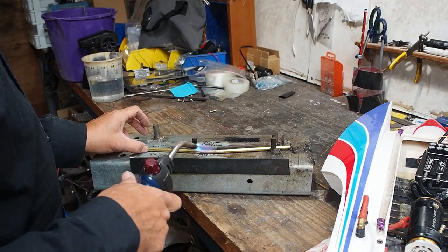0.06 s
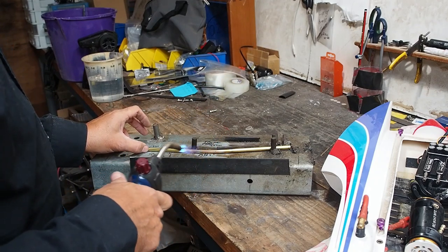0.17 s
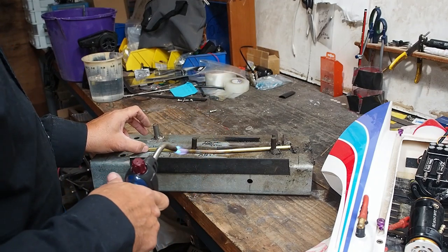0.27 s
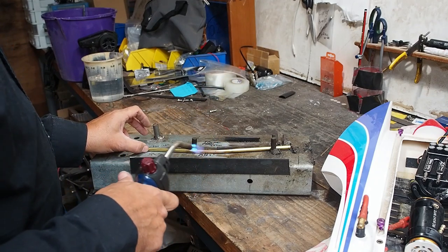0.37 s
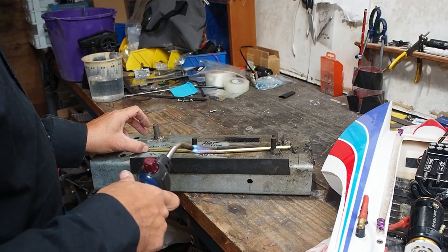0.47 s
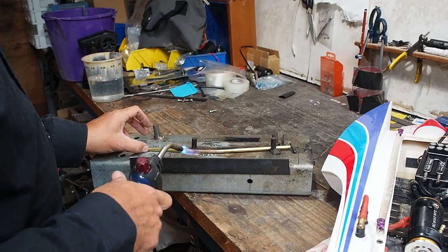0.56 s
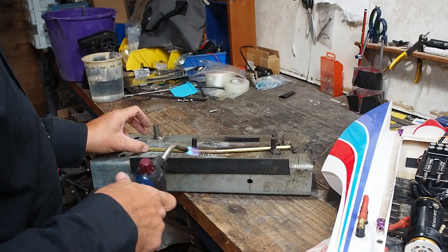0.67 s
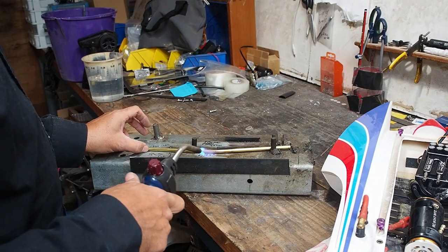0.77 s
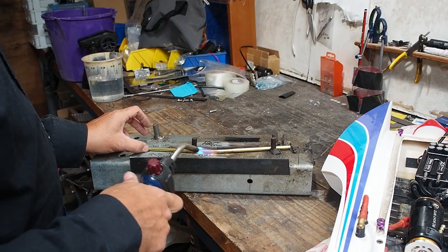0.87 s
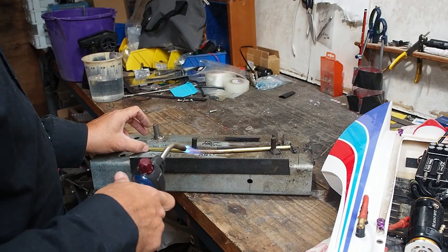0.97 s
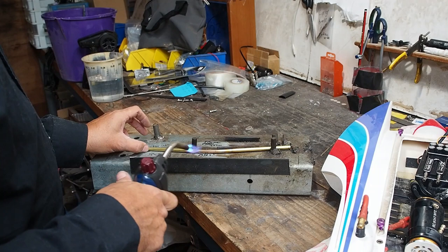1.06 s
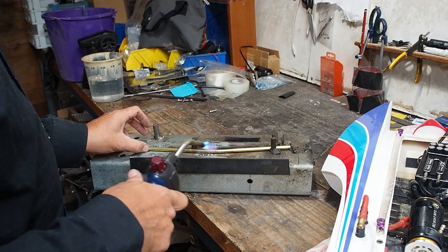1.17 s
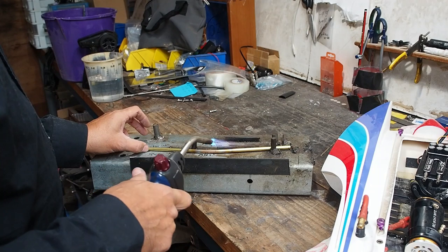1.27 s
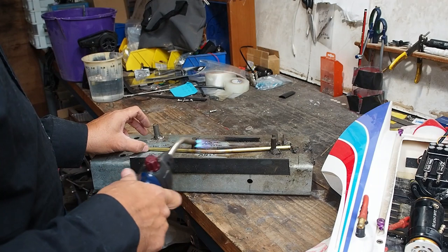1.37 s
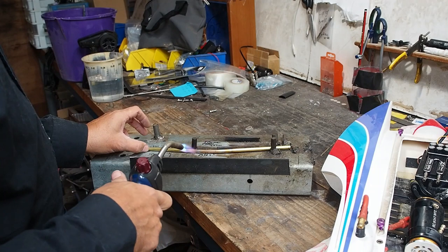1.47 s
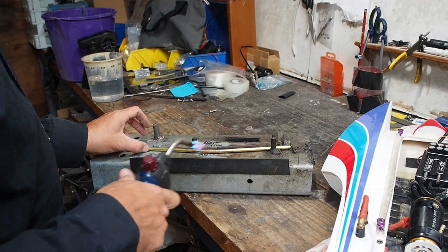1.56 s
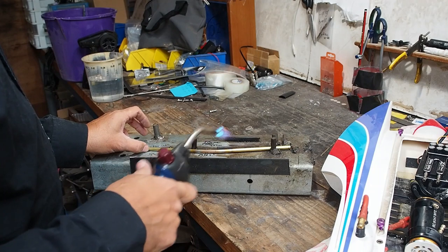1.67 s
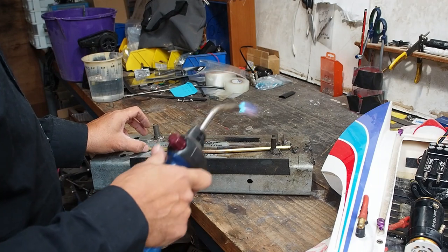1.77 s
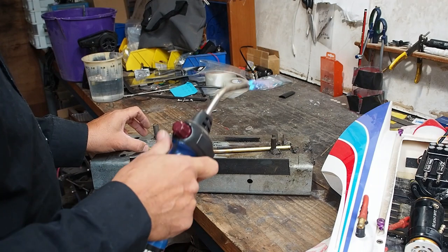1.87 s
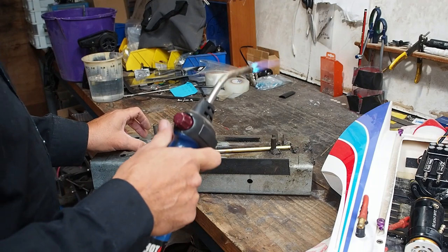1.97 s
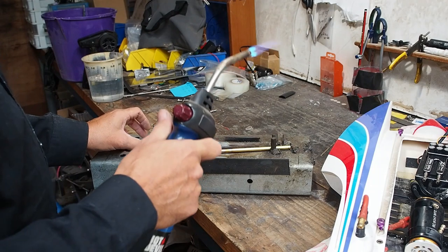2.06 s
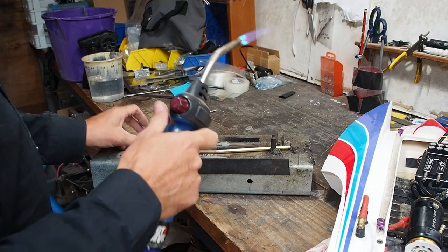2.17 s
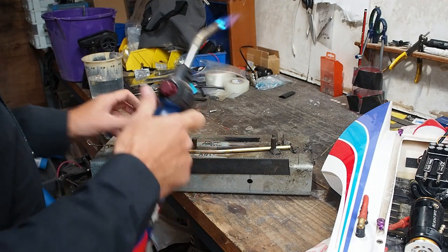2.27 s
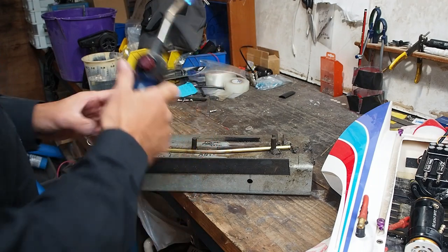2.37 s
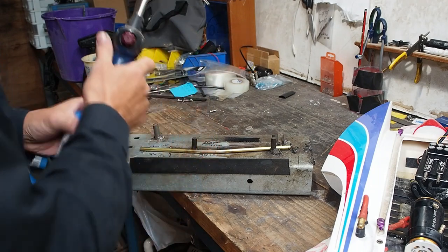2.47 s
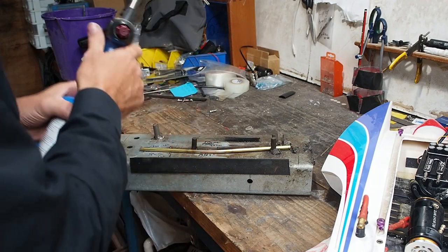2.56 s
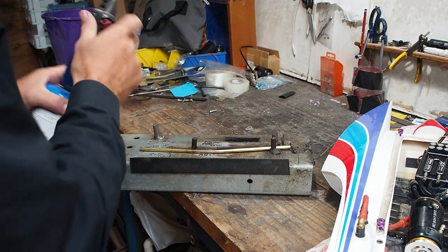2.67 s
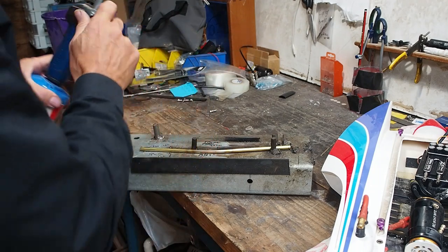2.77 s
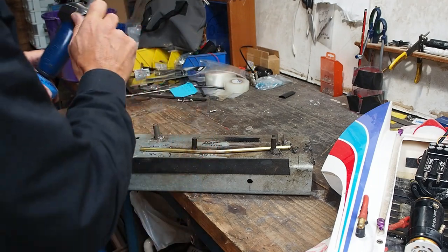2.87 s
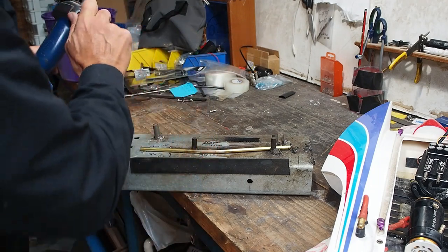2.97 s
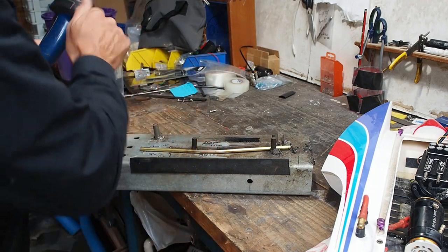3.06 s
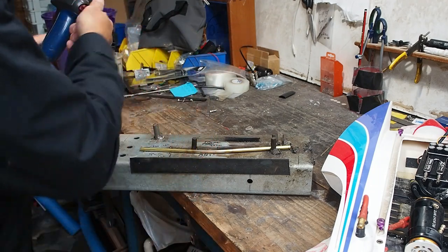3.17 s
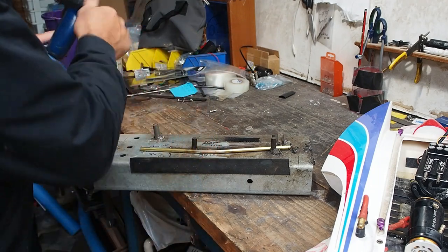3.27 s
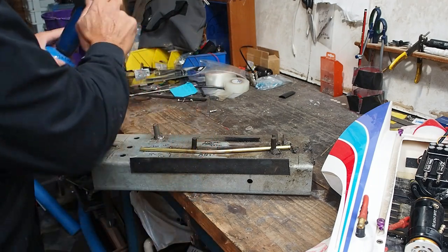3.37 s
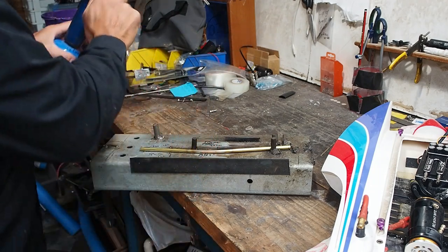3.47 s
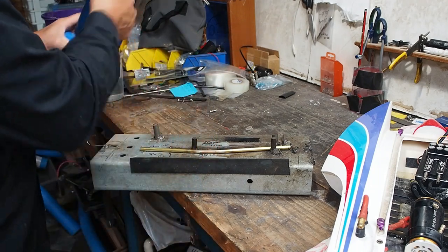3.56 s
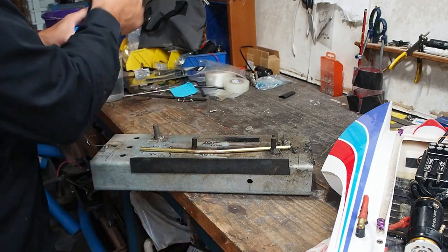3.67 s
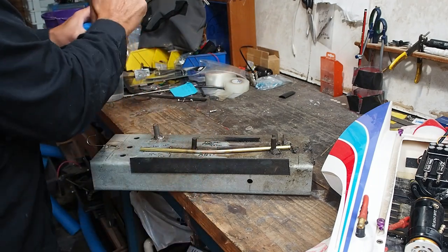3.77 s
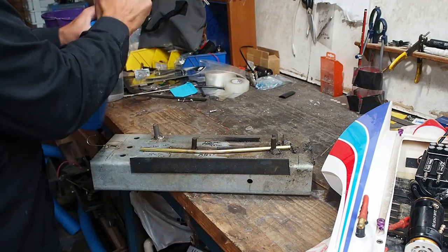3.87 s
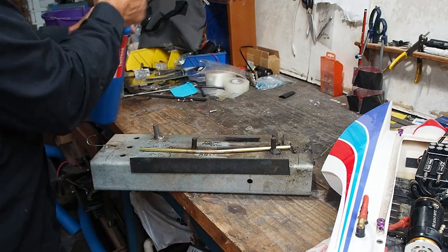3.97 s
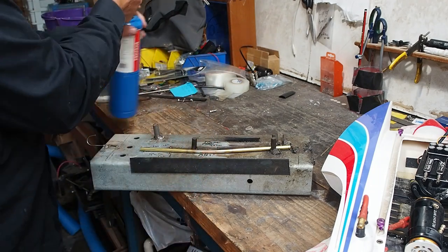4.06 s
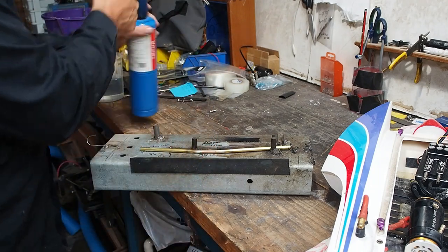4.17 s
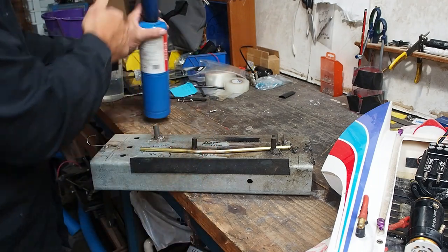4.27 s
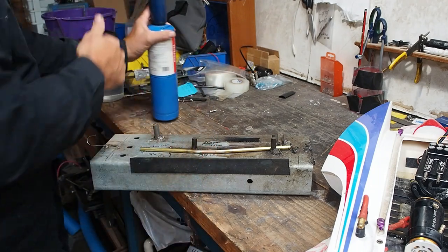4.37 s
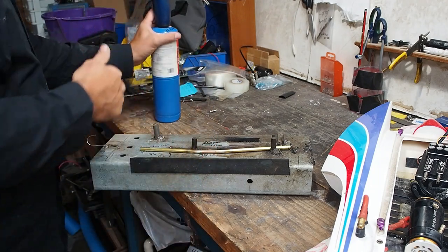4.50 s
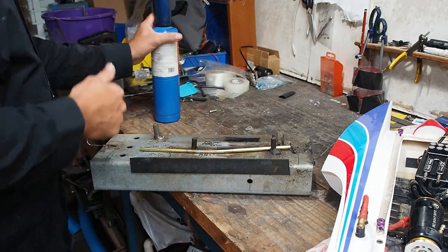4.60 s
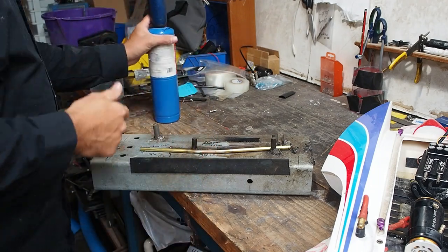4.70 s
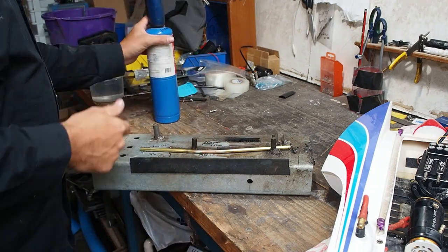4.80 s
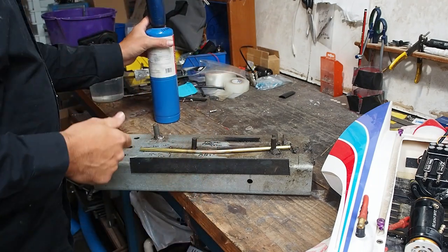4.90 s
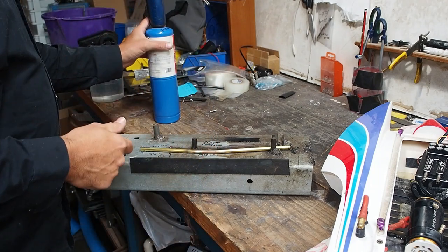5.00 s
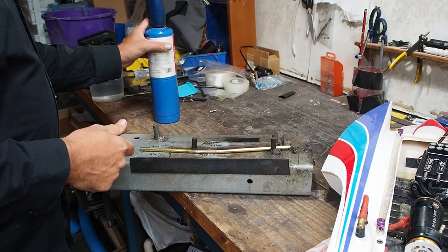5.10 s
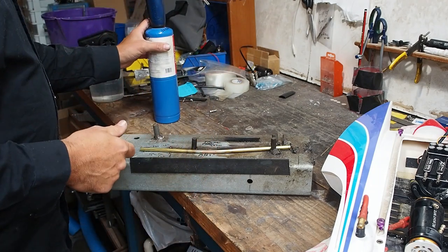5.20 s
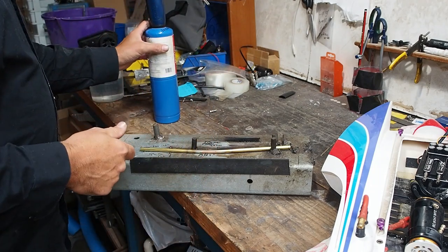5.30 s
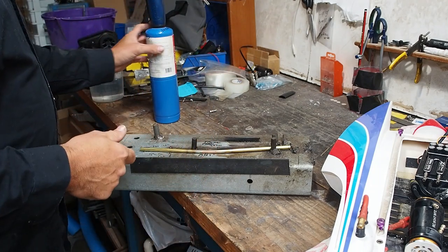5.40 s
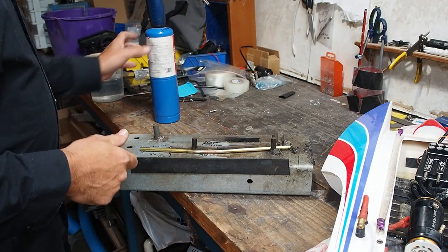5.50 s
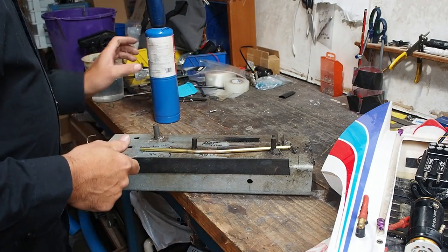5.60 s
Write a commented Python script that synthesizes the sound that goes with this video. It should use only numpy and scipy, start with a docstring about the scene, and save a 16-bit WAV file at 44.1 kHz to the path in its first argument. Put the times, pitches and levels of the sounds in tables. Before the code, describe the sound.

A close stereo view of a small, cluttered workshop with a quiet low rumble and faint airy noise underneath. From the start a handheld gas torch roars and hisses steadily over a brass tube, fluttering, with fine crackle and a few sharper sputters at about 0.6, 1.0 and 1.4 seconds. Around 1.7 seconds it is lifted away; the flame sounds deeper and more open, with a faint wavering howl around it. Near 2.8 seconds it sputters and sags as the valve turns, and by about 3.2 seconds it has choked to silence. From 3.4 to 4.0 seconds come a sleeve's soft rustle, tiny scrapes and clicks, and a bright metal latch snap at 3.8. At about 4.46 seconds the steel bottle lands on the wooden bench in a quick cluster of touches: a hollow boom, knock, short ring and tool rattle. It rocks faintly, with lighter bumps near 4.8, then only room quiet remains.

```python
"""Gas torch in a workshop

A handheld gas torch roars on a brass tube on a workbench, is lifted away and turned off at its valve.
A jacket sleeve rustles, the hand scrapes over the torch head, its latch clicks, and the steel gas bottle
lands on the wooden bench, which booms and rattles. The flame is fluttering noise with pops and a howl;
cloth and skin are noise and stick-slip pulses; latch, bottle and bench are struck modes.
All of it is heard from close by in a small, cluttered workshop with a quiet background."""
import sys
import numpy as np
from scipy import signal
from scipy.fft import rfft, irfft, next_fast_len
from scipy.io import wavfile
from scipy.ndimage import uniform_filter1d, map_coordinates

SR = 44100
rng = np.random.default_rng(int(sys.argv[2]) if len(sys.argv) > 2 else 0)


def digitize_waveform(pressure):
    """Quantize a signal to 16-bit integers and store it at the path in sys.argv[1].

    Rows of a 2-D input are taken as channels; values are limited to [-1, 1].
    """
    field = np.atleast_2d(pressure).T
    bounded = np.clip(field, -1, 1)
    quanta = np.round(bounded * 32767).astype(np.int16)
    wavfile.write(sys.argv[1], SR, quanta)


N = 248724  # samples
TIME = np.arange(N) / SR
SIZE = 2 * next_fast_len(N // 2 + SR // 2)  # FFT length with room for the echoes
FREQS = np.maximum(np.arange(SIZE // 2 + 1) * SR / SIZE, 1)

# Flame colour on the tube and in free air. Each row: frequency in Hz, relative level in dB per Hz.
TUBE_COLOUR = [(45, -12), (95, -7), (140, -5), (185, 2), (240, -6.5), (720, -1), (1300, -12.5), (2700, -13),
               (4400, -10), (5400, -9.5), (6300, -17), (7300, -11.5), (10000, -21), (12500, -23.5),
               (13700, -21), (15500, -29)]
FREE_COLOUR = [(45, -50), (95, -11.5), (185, 1.5), (240, -8), (900, 0.5), (2000, 2), (2800, -6.5),
               (5000, -3.5), (6500, -6), (7500, -3.5), (9000, -6.5), (12300, -14.5), (13700, -8.5),
               (15500, -19.5)]
# Resonances of the burner and the surfaces near it. Each row: centre in Hz, width in Hz, boost in dB.
TUBE_RESONANCES = [(361, 138, 10.5), (565, 124, 9.5), (693, 99, 8.5), (805, 96, 10.5), (888, 24, 11.5),
                   (1037, 224, 15.5), (1423, 130, 8.5), (1617, 44, 13.5), (1914, 140, 11), (2036, 64, 10),
                   (2218, 63, 13), (2340, 88, 2.5), (2635, 460, 6.5), (2960, 56, 11.5), (3270, 58, 5.5),
                   (3460, 250, 3.5), (3820, 200, 6.5)]
FREE_RESONANCES = [(344, 200, 7.6), (546, 75, 8.7), (743, 83, 12.2), (890, 176, 7.5), (1027, 170, 10.4),
                   (1172, 115, 7.4), (1527, 160, 8), (2440, 51, 1), (2760, 210, 7.7), (3266, 270, 6.7),
                   (3610, 270, 4.2), (4005, 440, 6.6)]
# Fixed notches of the room or microphone, in torch and background alike.
# Each row: centre in Hz, width in Hz, boost in dB (negative: a cut).
ROOM_DIPS = [(235, 30, -5), (459, 10, -8.5)]
# Sputters of the flame. Each row: time in seconds, click height in dB above the jet's average.
FLAME_SPUTTERS = [(.64, 24.5), (1.028, 27), (1.358, 24), (2.794, 18), (2.882, 22)]
# The nozzle hovers over the tube, then is lifted away.
# Each row: time in seconds, height above the bench in cm.
NOZZLE_HEIGHT = [(0, 10.1), (.55, 9.6), (1.1, 9.2), (1.33, 12), (1.55, 8.6), (1.66, 11), (1.77, 20),
                 (2.1, 25), (2.5, 29.4)]
# The howl moves as the torch swings and sinks as the flame dies.
# Each row: time in seconds, centre in Hz, level in dB before the valve closes.
HOWL_PATH = [(0, 989, -37), (1.1, 980, -33), (1.28, 760, -37), (1.62, 780, -38), (1.75, 1015, -46),
             (1.95, 998, -36), (2.04, 790, -32.5), (2.27, 899, -35.5), (2.5, 950, -29.5), (2.7, 983.4, -34),
             (2.77, 859.4, -32), (2.95, 1030, -33.5), (3.06, 1070, -35), (3.1, 920, -29), (3.17, 692, -34)]

# Bottle meeting the bench and rocking.
# Each row: time in seconds, then the blow to boom, knock, ring and clatter, each in relative dB.
BOTTLE_BLOWS = [(4.458, -7.5, -3.5, -9, -28), (4.4597, -34, -16, -27, -15.5), (4.4717, -13, -15, -14, -23),
                (4.482, -15.5, -27, -31, -31), (4.492, -47, -17, -13, -23), (4.769, -30, -22.5, -18.5, -40),
                (4.777, -24, -27.5, -27.5, -39), (4.951, -49.5, -32.5, -47, -72)]
# Slow modes of the bench top. Each row: pitch in Hz, level in dB, T60 in seconds.
BENCH_MODES = [(53.5, -16, .25), (87, -17, 0.1), (101, -9.5, 0.17), (125, -0.5, 0.11), (145, -14, 0.14),
               (180.1, -13.5, 0.54)]
# Modes of the wood under the bottle. Each row: pitch in Hz, level in dB, T60 in seconds.
KNOCK_MODES = [(249, -18, 0.26), (293, -13, .15), (335, -14.5, 0.18), (379, -13.5, 0.19), (429, 3.5, 0.024),
               (510, -13.5, 0.16), (560, -8.5, 0.018), (660, -12.5, 0.077)]
# Modes of the steel bottle. Each row: pitch in Hz, level in dB, T60 in seconds.
BOTTLE_MODES = [(730, -14, 0.057), (747, -17, 0.12), (806, -15, 0.22), (889, -20.5, 0.13),
                (923, -11, 0.056), (1088, -22, 0.063), (1220, -31, 0.26), (1400, -35, 0.14),
                (1630, -24, 0.049)]
# Colour of tools jolted on the bench. Each row: frequency in Hz, relative level in dB per Hz.
CLATTER_COLOUR = [(40, 4), (200, 14), (800, 13), (1500, 2.5), (2000, -2.5), (2800, -6), (5000, -10.5),
                  (8000, -11), (12000, -15), (15500, -15)]
# Tilts of the bottle, each swelling a low note. Each row: centre in seconds, level in dB, pitch in Hz.
BOTTLE_TILTS = [(4.555, -23, 182), (4.619, -37, 175), (4.861, -33, 171), (4.908, -29, 127),
                (4.971, -39, 150), (5.034, -40.5, 147)]

# The torch's metal latch snaps and rebounds. Each row: time in seconds, strength in dB.
LATCH_HITS = [(3.783, -29.5), (3.798, -50)]
# Modes of the latch. Each row: pitch in Hz, level in dB, T60 in seconds.
LATCH_MODES = [(2360, 1, .03), (2490, -0.5, 0.033), (2930, -8, .025), (5170, -15, .03)]
# Small clicks of hands, torch head and bottle.
# Each row: start in seconds, relative level in dB, pitch in Hz, width in Hz, T60 in seconds.
SMALL_CLICKS = [(3.369, -36.5, 3290, 1500, 0.054), (3.65, -27, 13800, 1600, 0.04),
                (3.783, -30, 3000, 2500, 0.024), (3.785, -28.5, 1220, 400, 0.025),
                (3.865, -31, 2320, 450, 0.035), (3.982, -31.5, 800, 600, 0.029),
                (4.024, -30.5, 1250, 250, .04), (4.847, -30.5, 5100, 1540, 0.053),
                (4.847, -31, 10900, 7100, 0.02)]
# Scrapes of the hand over torch head and bottle.
# Each row: start in seconds, length in seconds, level in dB, pitch in Hz, nominal width in Hz.
HAND_SCRAPES = [(3.493, 0.022, -42, 3750, 900), (3.495, 0.039, -49, 2050, 1000),
                (3.536, 0.078, -49, 2350, 650), (3.881, 0.032, -45.5, 2340, 450),
                (3.888, 0.028, -41, 3350, 700), (3.958, 0.013, -39, 3750, 700),
                (3.967, .012, -39, 2700, 500), (3.995, 0.037, -46, 2690, 600)]
# Strokes of the sleeve. Each row: start in seconds, length in seconds, level in dB.
SLEEVE_STROKES = [(3.476, 0.14, -41.5), (3.711, .02, -49), (3.857, 0.17, -43), (3.956, 0.016, -44)]
# Colour of the rubbing cloth. Each row: frequency in Hz, relative level in dB per Hz.
CLOTH_COLOUR = [(400, -29), (750, -5.5), (1200, -6), (1550, -14), (2300, -1.5), (3050, -6), (3750, -2.5),
                (4600, -7.5), (6100, -4), (9900, -10), (13400, -8), (15500, -10.5)]

# The torch swings a little to the right, then the handling moves to the left.
# Each row: time in seconds, lag of the right channel in seconds.
SOURCE_BEARING = [(1.6, .000002), (2.0, -.00002), (2.5, .000003), (2.9, .000024), (3.5, .00003),
                  (4.4, .00002)]
# Microphone pair for near sounds. Each row: frequency in Hz, left over right in dB.
NEAR_PAN = [(100, -0.5), (700, 0.65), (2400, 0.5), (4400, 0.5), (8100, 5), (10500, 2.5), (13500, -4.5),
            (15500, -3)]
# Microphone pair for diffuse sound. Each row: frequency in Hz, side over mid in dB.
DIFFUSE_WIDTH = [(50, -7), (130, -3), (300, -8.5), (650, -7.5), (1400, -5), (3000, 2.5), (15000, 0.5)]
# Echo strength. Each row: frequency in Hz, echo level in dB relative to the direct sound.
ECHO_LEVEL = [(100, -51), (400, -11.5), (1200, -0.5), (3000, 0), (8000, 0), (15000, 6.5)]
# Echo decay. Each row: frequency in Hz, T60 in seconds.
ECHO_T60 = [(100, 1), (500, 0.5), (1200, 0.41), (4000, 0.37), (15000, 0.28)]
# Workshop background colour. Each row: frequency in Hz, relative level in dB per Hz.
BACKGROUND_COLOUR = [(30, -1), (50, -7), (80, -0.5), (110, -.5), (160, -3), (260, -7), (650, -11),
                     (1100, -10.5), (2400, -17), (4200, -17), (6500, -21), (7800, -18), (10000, -22.5),
                     (12500, -23), (13700, -17), (15500, -19)]
# Resonances of the background. Each row: centre in Hz, width in Hz, boost in dB.
BACKGROUND_RESONANCES = [(134, 31, 4.1), (186, 17, 4.9), (320, 130, 0.9), (1030, 140, 7.2),
                         (1700, 330, 4.3), (3420, 470, 6.2)]

SOUND_CM_PER_S = 34300
# above this height the flame slips off the tube, over about this reach, up to this share in free air
TUBE_CM, REACH_CM, FREE_SHARE = 8.4, 5.3, 0.86
# level of each part of the flame on the tube, and its change in free air (dB)
ROAR_DB, ROAR_FREE_DB = -29, -1
RUSH_DB, RUSH_FREE_DB = -37.5, 3
HISS_DB, HISS_FREE_DB = -33, 1.05
# around one height the bench deepens the roar; the spread is in octaves of height
DEEP_CM, DEEP_OCTAVES = 20.7, 0.66
# bass boost at that height and elsewhere, then the change of roar, rush and hiss at that height
DEEP_BASS_DB, PLAIN_BASS_DB = 9.5, -2.5
DEEP_ROAR_DB, DEEP_RUSH_DB, DEEP_HISS_DB = -2.5, 3, -0.68
# above this height the roar loses its bass
THIN_CM, THIN_DB_PER_CM = 27.4, 1.2
HOWL_WIDTH_HZ = 210
# the valve is turned: the flow sags, then the needle seats and chokes it by 60 dB within CHOKE_S
VALVE_TURN_S, SAG_DB_PER_S = 2.81, 5
VALVE_SEAT_S, CHOKE_S = 3.033, 0.29
BURN_POWER = 1.65  # burning follows the flow to this power, so it dies sooner than the gas hiss
# after landing, the bottle's rim rolls on the wood, ever more quietly, until it stands
ROLL_DB, ROLL_FADE_DB_PER_S, ROLL_S = -34, 22, 0.63
TILT_S = 0.015
SCRAPE_ATTACK_S, SCRAPE_T60_S = 0.009, 0.046
STROKE_ATTACK_S, STROKE_T60_S = 0.025, 0.049
# strong first cluster of echoes from the bench and its clutter: dB above the later ones, and its T60
EARLY_DB, EARLY_T60_S = 5.5, 0.037
BACKGROUND_DB = -46.5
CUTOFF_HZ = 15850


def from_db(db):
    """Decibels to gain."""
    return 10 ** (np.asarray(db) / 20)


def rms_one(x):
    """Scale to unit power."""
    return x / np.sqrt(np.mean(x ** 2) + 1e-20)


def in_time(rows):
    """Each column of a curve at every sample."""
    seconds, *columns = np.transpose(rows)
    return [np.interp(TIME, seconds, column) for column in columns]


def at_hz(points, hz=FREQS):
    """Read a spectrum on a log-frequency axis."""
    f, value = np.transpose(points)
    return np.interp(np.log(hz), np.log(f), value)


def drift(rate):
    """Smooth chance with spread 1 that turns about rate times a second."""
    knots = rng.standard_normal(N // 8)
    return rms_one(map_coordinates(knots, [TIME * rate], order=2, mode="wrap"))


def butter(x, order, hz, kind="low"):
    """Causal low- or high-pass."""
    return signal.sosfilt(signal.butter(order, hz, kind, fs=SR, output="sos"), x)


def butter_even(x, order, hz, kind="low"):
    """Low- or high-pass run both ways, so that it adds no delay."""
    return signal.sosfiltfilt(signal.butter(order, hz, kind, fs=SR, output="sos"), x)


def colour(x, spectrum, peaks=()):
    """Causal filter with a broad spectrum and resonant boosts; white noise keeps its power."""
    level = at_hz(spectrum)
    for hz, width, boost in peaks:
        level = level + boost / (1 + (2 * (FREQS - hz) / width) ** 2)
    # folding the cepstrum forward in time gives minimum phase: no pre-ringing
    cepstrum = irfft(np.log(rms_one(from_db(level))))
    response = np.exp(2 * rfft(cepstrum[:SIZE // 2], SIZE) - cepstrum[0])
    return irfft(rfft(x, SIZE) * response)[..., :N]


def impulses(times, levels_db):
    """One single-sample click at each time."""
    out = np.zeros(N)
    out[np.round(np.asarray(times) * SR).astype(int)] = from_db(levels_db)
    return out


def ring(hits, modes):
    """Every hit sets each mode ringing as a dying sine; neighbouring modes swing in opposite directions."""
    t = TIME[:SR]
    response = 0
    for k, (hz, db, t60) in enumerate(modes):
        response = response + (-1) ** k * from_db(db - 60 * t / t60) * np.sin(2 * np.pi * hz * t)
    return signal.fftconvolve(hits, response)[:N]


def resonance(x, hz, width):
    """One resonance at unit power."""
    r = np.exp(-np.pi * width / SR)
    poles = [1, -2 * r * np.cos(2 * np.pi * hz / SR), r * r]
    return rms_one(signal.lfilter([1, 0, -1], poles, x))


def burst(start, t60):
    """Envelope that jumps up at start and dies away."""
    return (TIME >= start) * from_db(-60 * np.clip((TIME - start) / t60, 0, 2))


def stroke(start, length, attack_s, t60):
    """Envelope of a rub: it builds up, holds and dies away."""
    attack = np.clip((TIME - start) / attack_s, 0, 1)
    return attack * from_db(-60 * np.clip((TIME - start - length) / t60, 0, 2))


def steady(x, size=8000):
    """Even out changes of level slower than about size samples; faster flutter stays."""
    return x / np.sqrt(np.abs(uniform_filter1d(x ** 2, size)) + 1e-12)


def torch(echo_share=0.16):
    """Turbulent burning: roar, rush and hiss of one jet, coloured by where the flame points."""
    height, = in_time(NOZZLE_HEIGHT)
    lift = np.clip(FREE_SHARE * (1 - np.exp((TUBE_CM - height) / REACH_CM)), 0, 1)
    deep = np.exp(-.5 * (np.log2(height / DEEP_CM) / DEEP_OCTAVES) ** 2)
    thinning_db = THIN_DB_PER_CM * np.maximum(height - THIN_CM, 0)
    bass_db = deep * DEEP_BASS_DB + (1 - deep) * PLAIN_BASS_DB - thinning_db
    jet = gas_jet() + impulses(*np.transpose(FLAME_SPUTTERS))
    on_tube = colour(jet, TUBE_COLOUR, TUBE_RESONANCES + ROOM_DIPS)
    in_air = colour(jet, FREE_COLOUR, FREE_RESONANCES + ROOM_DIPS)
    flame = (1 - lift) * on_tube + lift * in_air
    # combustion roars below, the gas jet hisses above, the rush lies between
    lows = butter_even(flame, 4, 1200)
    highs = butter_even(flame, 4, 2500, "high")
    mids = flame - lows - highs
    # surfaces close to the flame reinforce its bass
    lows = lows + (from_db(bass_db) - 1) * butter_even(lows, 3, 700)
    # the hiss bounces off the bench: hollow bands that sweep as the nozzle moves
    bounce = map_coordinates(highs, [(TIME - 2 * height / SOUND_CM_PER_S) * SR], order=3)
    highs = highs + echo_share * (1 - lift / 2) * bounce
    roar = steady(lows) * from_db(ROAR_DB + ROAR_FREE_DB * lift + DEEP_ROAR_DB * deep)
    rush = steady(mids) * from_db(RUSH_DB + RUSH_FREE_DB * lift + DEEP_RUSH_DB * deep)
    hiss = steady(wander(highs)) * from_db(HISS_DB + HISS_FREE_DB * lift + DEEP_HISS_DB * deep)
    flow = gas_flow()
    return (roar + howl() + rush) * flow ** BURN_POWER + hiss * flow


def gas_jet(flutter_db=1.0, flutter_rate=70, crackle_db=-2.5, crackles_per_s=2500, spread_db=3.5):
    """Turbulent gas: white noise full of tiny pops of uneven size, fluttering as a whole."""
    sizes = from_db(spread_db * np.minimum(rng.exponential(1, N), 5))
    pops = (rng.random(N) < crackles_per_s / SR) * sizes * rng.choice([-1, 1], N)
    turbulence = rng.standard_normal(N) + from_db(crackle_db) * rms_one(pops)
    return rms_one(turbulence * from_db(flutter_db * drift(flutter_rate)))


def wander(x, rate=6.44, count=20, depth_db=1.1):
    """The colour shifts slightly with small moves of the hand: each band swells and sinks on its own."""
    spectrum = rfft(x, SIZE)
    place = np.interp(FREQS, np.geomspace(1500, 14000, count), np.arange(count))
    out = 0
    for k in range(count):
        band = irfft(spectrum * np.maximum(1 - abs(place - k), 0))[:N]
        out = out + band * from_db(depth_db * drift(rate))
    return out


def howl():
    """Turbulence in one moving resonance: narrow noise carried up to a gliding centre."""
    hz, db = in_time(HOWL_PATH)
    a, b = butter(rng.standard_normal((2, N)), 2, HOWL_WIDTH_HZ / 2)
    turn = 2 * np.pi * np.cumsum(hz) / SR
    return steady(a * np.cos(turn) + b * np.sin(turn)) * from_db(db)


def gas_flow():
    """Gain of the flame as the valve is turned shut: a slow sag, then an ever steeper choke."""
    sag_db = SAG_DB_PER_S * np.maximum(TIME - VALVE_TURN_S, 0)
    choke_db = 60 * np.clip((TIME - VALVE_SEAT_S) / CHOKE_S, 0, 2) ** 2
    return from_db(-sag_db - choke_db)


def bottle(clatter_db=-0.5, clatter_t60=0.07, grain_db=-2.0, lowest_hz=84):
    """The rim lands in several touches: the bench booms and knocks, the bottle rings, loose tools clatter."""
    times, boom, knock, shell, clatter = np.transpose(BOTTLE_BLOWS)
    body = ring(impulses(times, boom), BENCH_MODES)
    body = body + ring(impulses(times, knock), KNOCK_MODES)
    body = body + ring(impulses(times, shell), BOTTLE_MODES)
    # the boom, knock and rocking are thinned below the lowest pitch
    wood = butter(body + rocking(times[0]), 3, lowest_hz, "high")
    jolts = sum(from_db(db + clatter_db) * burst(s, clatter_t60) for s, db in zip(times, clatter))
    rattle = jolts * rng.standard_normal(N) * from_db(grain_db * drift(700))
    return wood + colour(rattle, CLATTER_COLOUR)


def rocking(landing):
    """The rim rolls on the wood: a fading rumble of bench modes, and a low note at every tilt."""
    age = TIME - landing
    rolling = (age > TILT_S) * (age < ROLL_S)
    roll = rolling * from_db(ROLL_DB - ROLL_FADE_DB_PER_S * np.maximum(age, 0))
    out = steady(ring(rng.standard_normal(N), BENCH_MODES), size=1500) * uniform_filter1d(roll, size=1500)
    for s, db, hz in BOTTLE_TILTS:
        swell = np.exp(-.5 * ((TIME - s) / TILT_S) ** 2)
        out = out + from_db(db) * swell * np.sin(2 * np.pi * hz * (TIME - s))
    return out


def latch():
    """The metal latch snaps and rebounds, each hit ringing its small stiff modes."""
    return ring(impulses(*np.transpose(LATCH_HITS)), LATCH_MODES)


def handling_clicks(level_db=-8.0):
    """Each click is a short rattle: noise in one resonance that dies at once."""
    out = 0
    for s, db, hz, width, t60 in SMALL_CLICKS:
        rattle = resonance(rng.standard_normal(N), hz, width)
        out = out + from_db(db + level_db) * rattle * burst(s, t60)
    return out


def scrapes(slips_per_s=850, unevenness=.5, spread_db=2.0):
    """Skin sticks and slips on the metal in a quick, uneven run, setting one of its resonances rasping."""
    slip_rate = slips_per_s * np.exp(unevenness * drift(600))
    slips = np.diff(np.floor(np.cumsum(slip_rate) / SR), prepend=0)
    rasp = slips * from_db(spread_db * rng.standard_normal(N)) * rng.choice([-1, 1], N)
    out = 0
    for s, length, db, hz, width in HAND_SCRAPES:
        # two wide resonators in a row give steeper skirts
        tone = resonance(resonance(rasp, hz, 2 * width), hz, 2 * width)
        out = out + from_db(db) * tone * stroke(s, length, SCRAPE_ATTACK_S, SCRAPE_T60_S)
    return out


def sleeve(grain_db=2.0, grain_rate=400, fold_db=2.5, fold_rate=40):
    """Woven cloth slides in many tiny catches; its folds pass unevenly, lows and highs each in their own way."""
    catches = rng.standard_normal(N) * from_db(grain_db * drift(grain_rate))
    rub = colour(rms_one(catches), CLOTH_COLOUR)
    lows = butter(rub, 2, 3200)
    folds = sum(part * from_db(fold_db * drift(fold_rate)) for part in (lows, rub - lows))
    moves = 0
    for s, length, db in SLEEVE_STROKES:
        moves = moves + from_db(db) * stroke(s, length, STROKE_ATTACK_S, STROKE_T60_S)
    return folds * moves


def workshop(x, shifts_per_s=4., count=4):
    """Direct sound plus echo patterns that blend into one another as hands and body move."""
    blend = np.array([drift(shifts_per_s) for _ in range(count)])
    blend = blend / np.linalg.norm(blend, axis=0)
    reflected = sum(rfft(x * share, SIZE) * echoes() for share in blend)
    lag, = in_time(SOURCE_BEARING)
    right = map_coordinates(x, [(TIME - lag) * SR], order=5)
    direct = rfft([x, right], SIZE)
    wet = from_db(at_hz(ECHO_LEVEL))
    both = (direct + wet * reflected) / np.sqrt(1 + wet ** 2 / 2)
    return irfft(both * from_db(at_hz(NEAR_PAN) * [[.5], [-.5]]))[:, :N]


def echoes(first_echo=0.0019):
    """Frequency response of dense echoes: a quick cluster from the bench, then the walls, highs dying first."""
    t, tail = TIME[:SR // 2], 0
    white = rfft(rng.standard_normal((2, len(t))))
    hz = np.maximum(np.arange(white.shape[1]) * SR / len(t), 1)
    early = from_db(EARLY_DB - 60 * t / EARLY_T60_S)
    for low in 2. ** np.arange(5, 15):  # octave bands, each with its own decay
        band = irfft(white * (hz >= low) * (hz < 2 * low), len(t))
        late = from_db(-60 * t / at_hz(ECHO_T60, low * np.sqrt(2)))
        decay = (early + late) * (t > first_echo)
        tail = tail + band * decay / np.linalg.norm(decay)
    return rfft(diffuse(tail), SIZE)


def diffuse(pair):
    """Two unrelated signals as a sound from all round: more alike in the bass, apart in the treble."""
    mid, side = rfft(pair, SIZE)
    width = from_db(at_hz(DIFFUSE_WIDTH))
    return irfft((mid + side * width * [[1], [-1]]) / np.sqrt(1 + width ** 2))[:, :N]


def background():
    """Quiet, even rush and low rumble of the workshop: coloured noise from all round."""
    noise = colour(rng.standard_normal((2, N)), BACKGROUND_COLOUR, BACKGROUND_RESONANCES + ROOM_DIPS)
    return diffuse(noise) * from_db(BACKGROUND_DB)


def scene():
    """Torch, handling and bottle share one room; the background lies under them."""
    handling = sleeve() + scrapes() + handling_clicks() + latch()
    return workshop(torch() + handling + bottle()) + background()


def record(dry):
    """The microphone thins the deep bass; the top is cut."""
    thinned = butter(dry, 2, 35, "high")
    return signal.sosfilt(signal.ellip(12, .1, 80, CUTOFF_HZ, fs=SR, output="sos"), thinned)


dry = scene()
out = record(dry)
digitize_waveform(out)
```